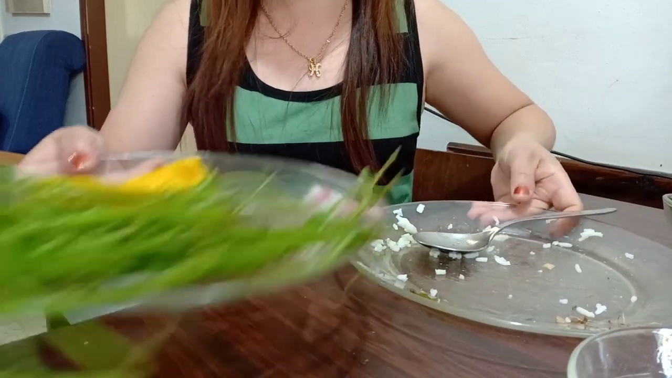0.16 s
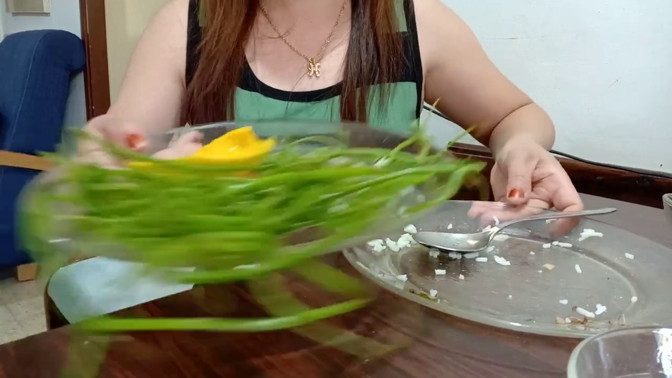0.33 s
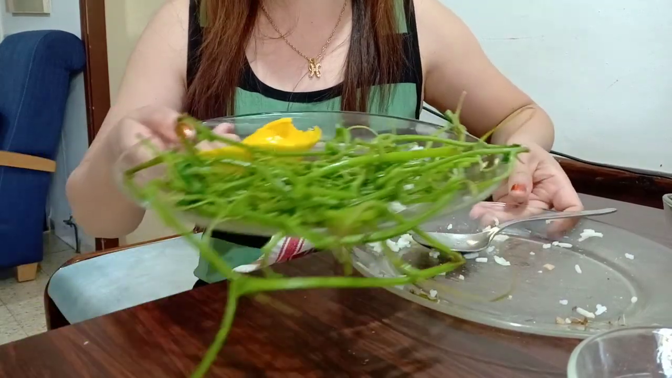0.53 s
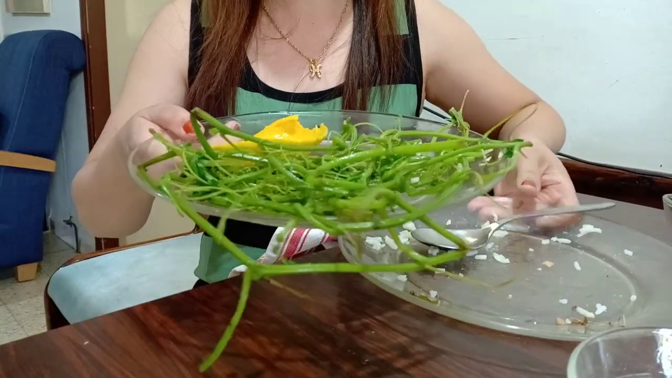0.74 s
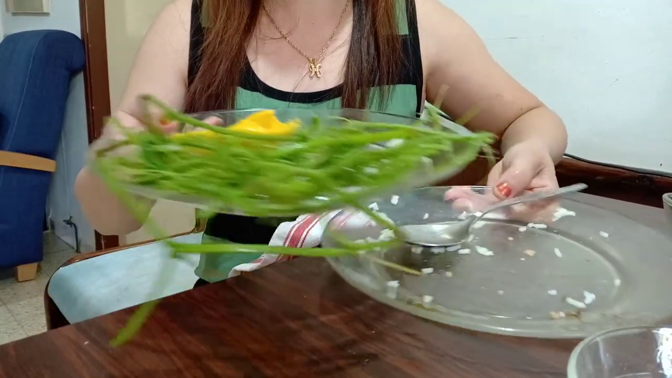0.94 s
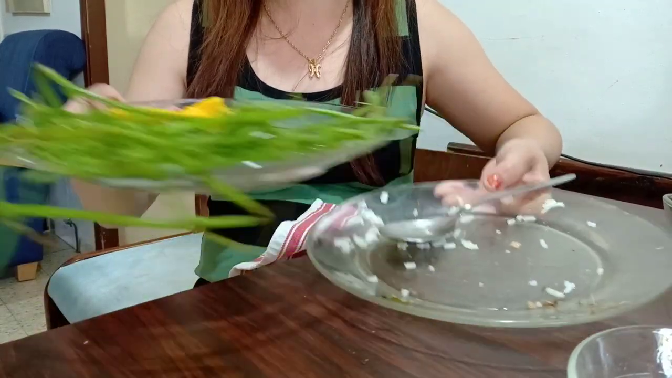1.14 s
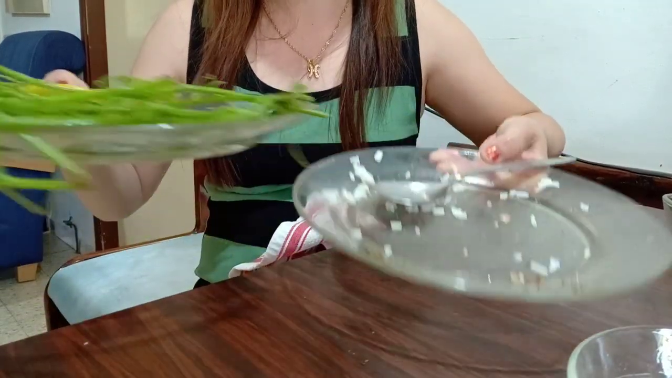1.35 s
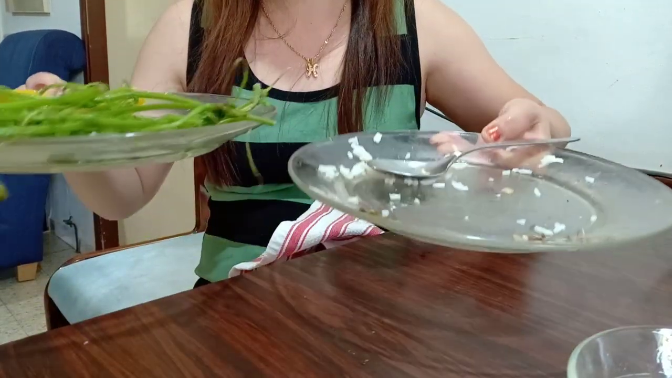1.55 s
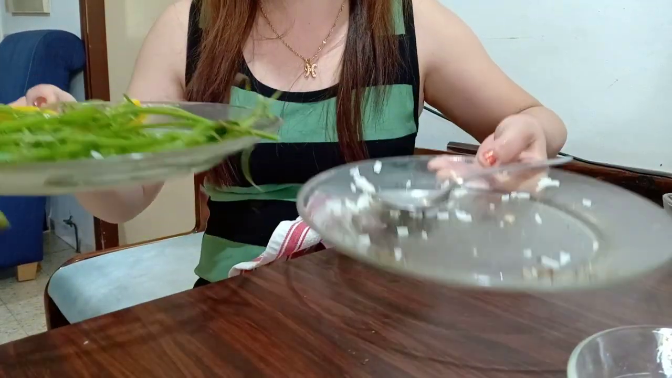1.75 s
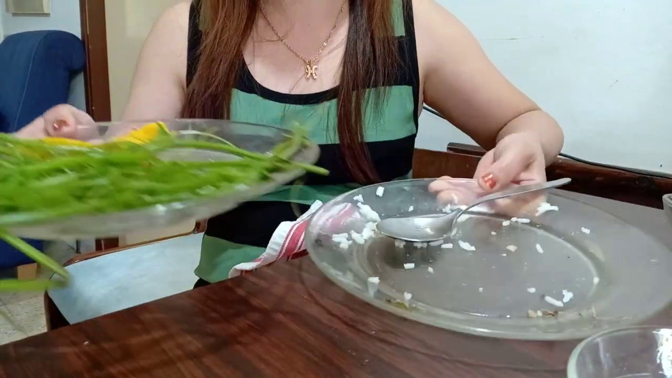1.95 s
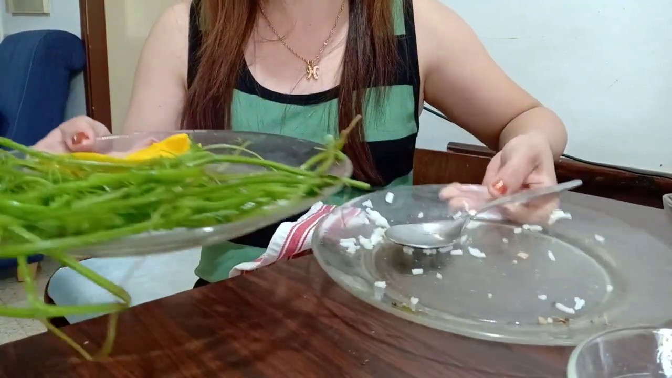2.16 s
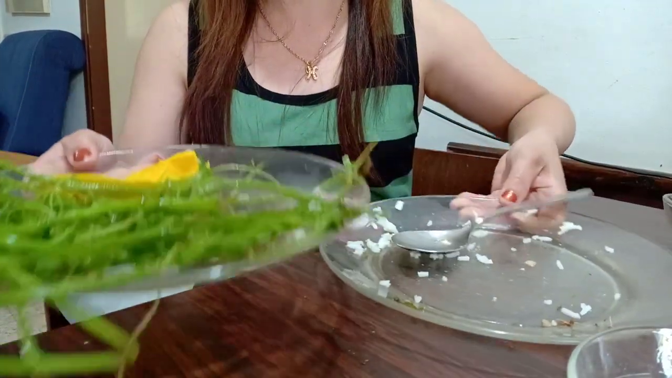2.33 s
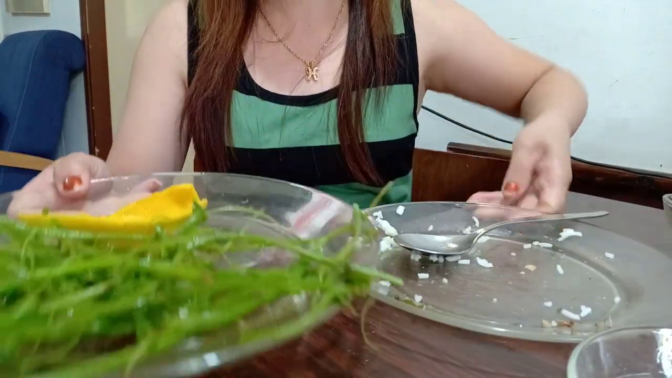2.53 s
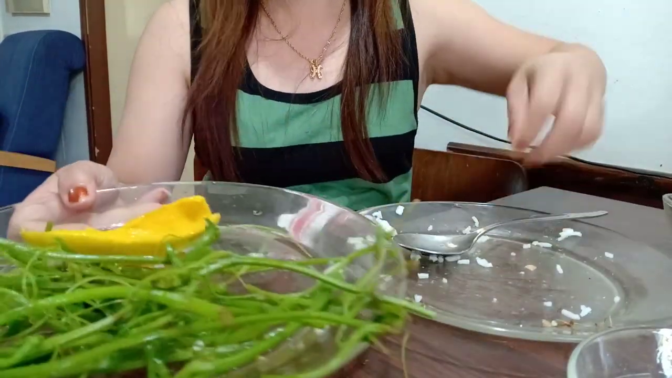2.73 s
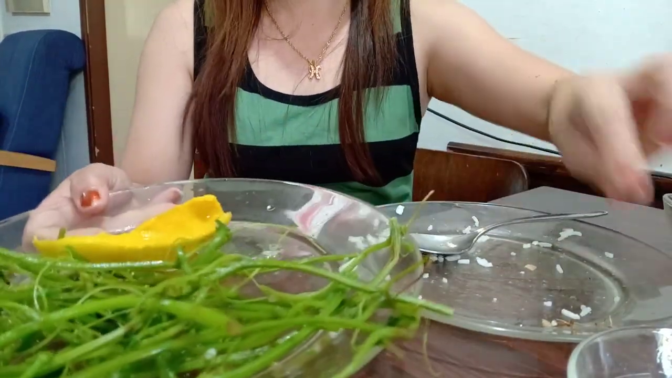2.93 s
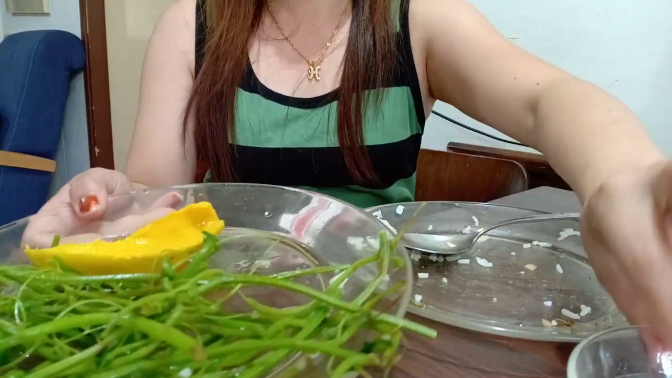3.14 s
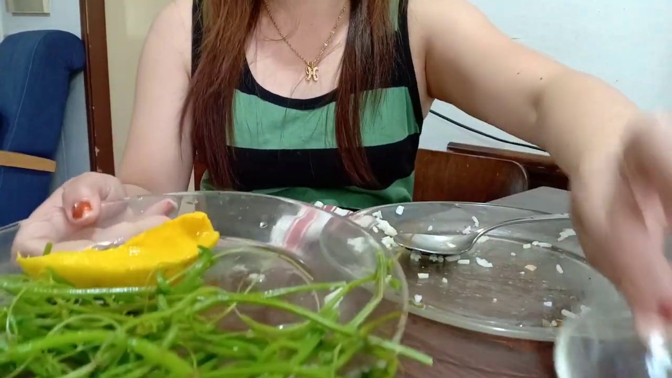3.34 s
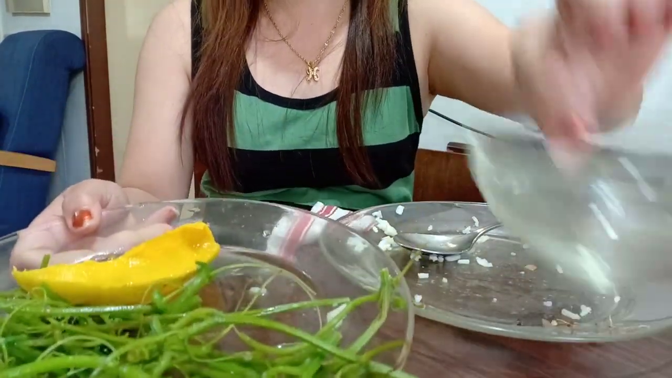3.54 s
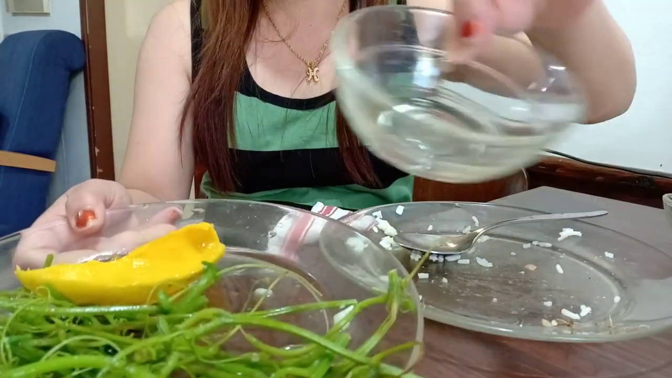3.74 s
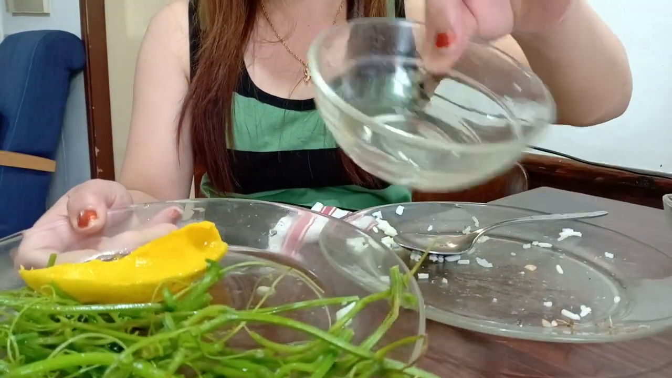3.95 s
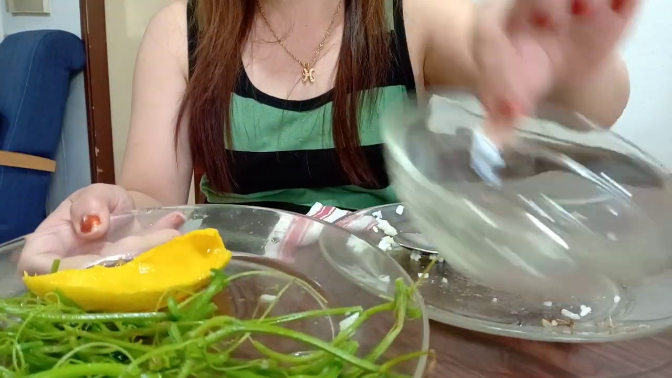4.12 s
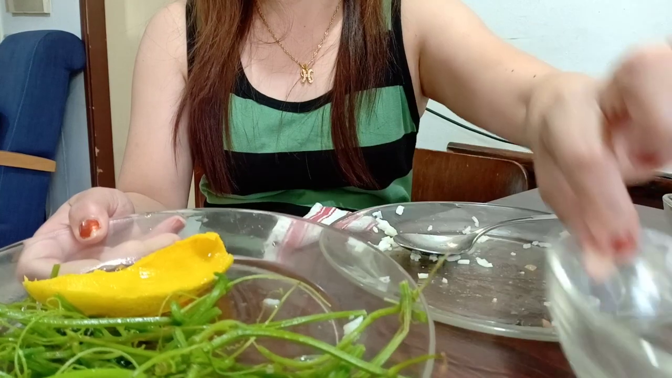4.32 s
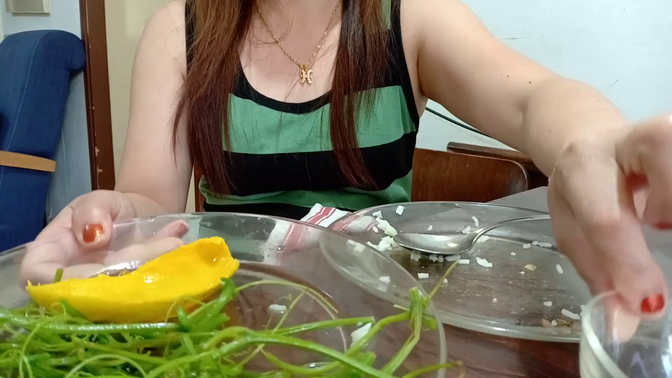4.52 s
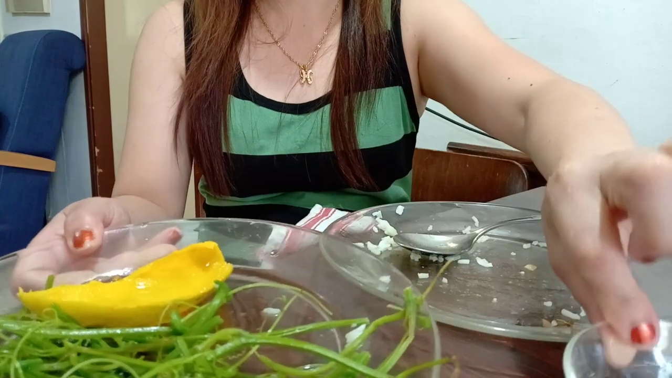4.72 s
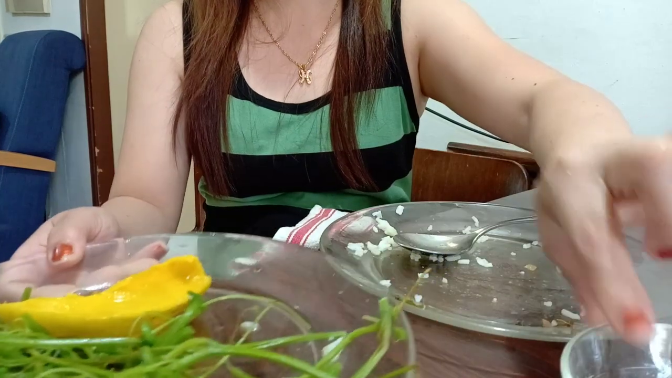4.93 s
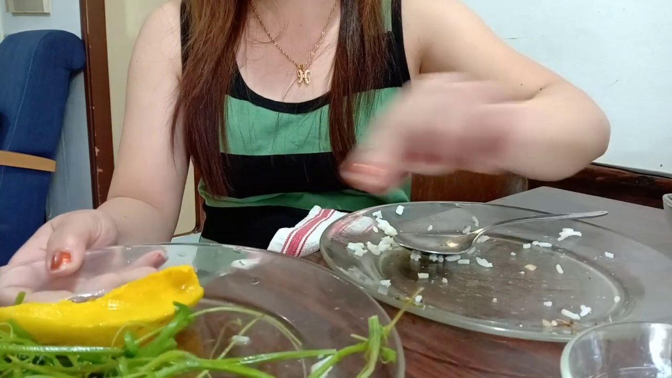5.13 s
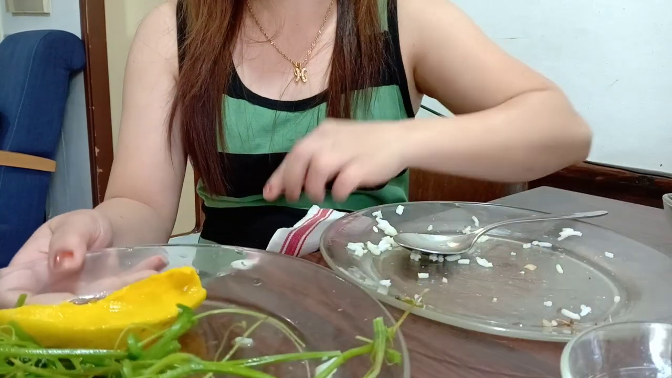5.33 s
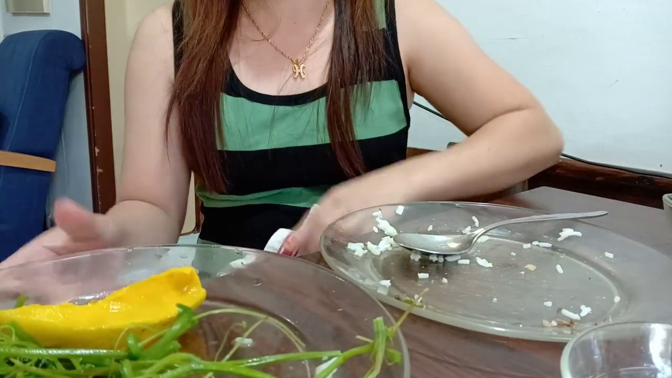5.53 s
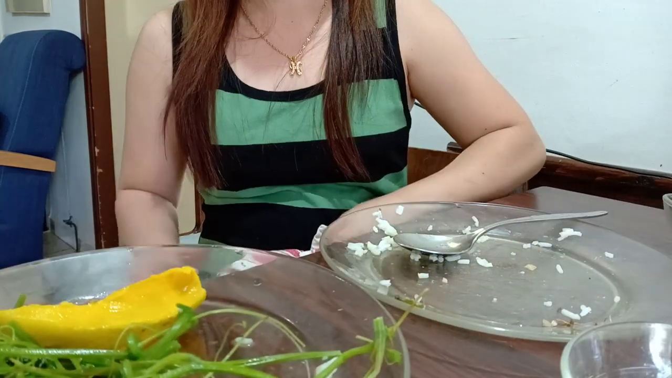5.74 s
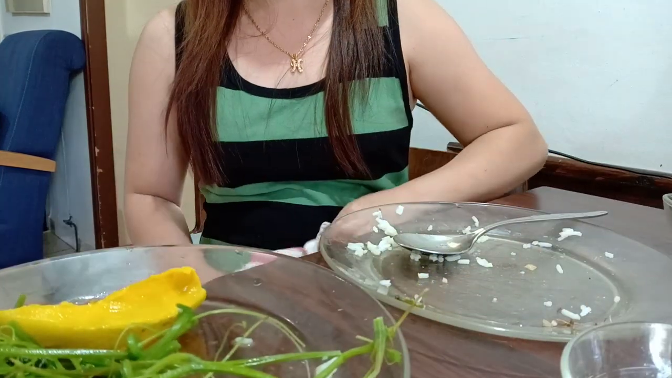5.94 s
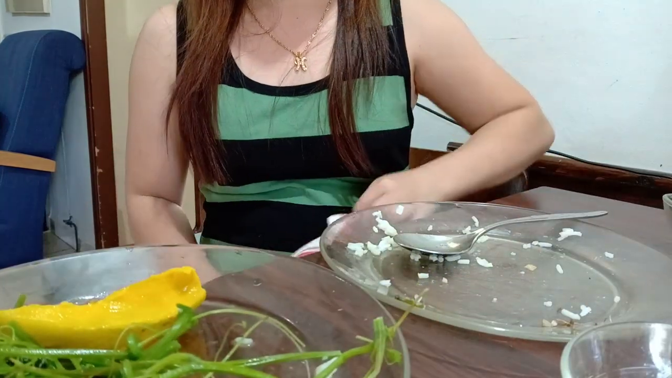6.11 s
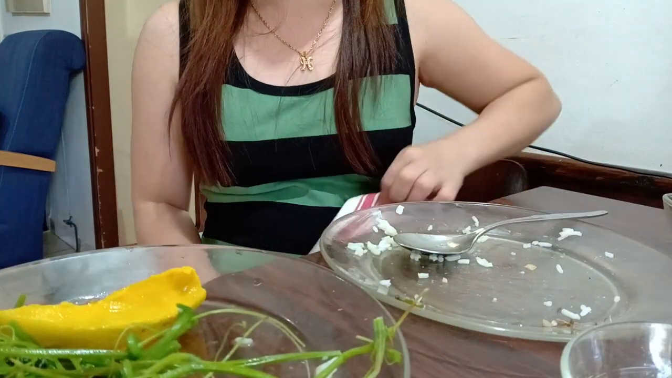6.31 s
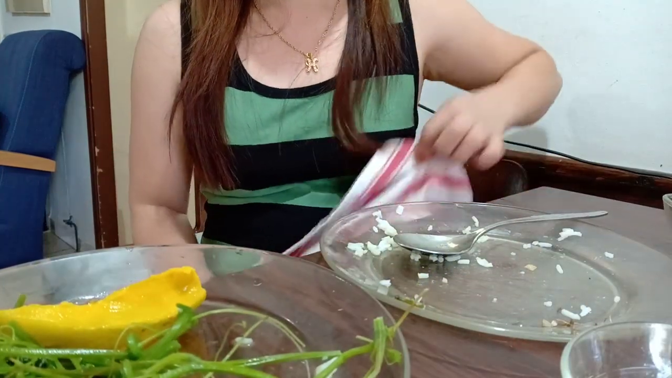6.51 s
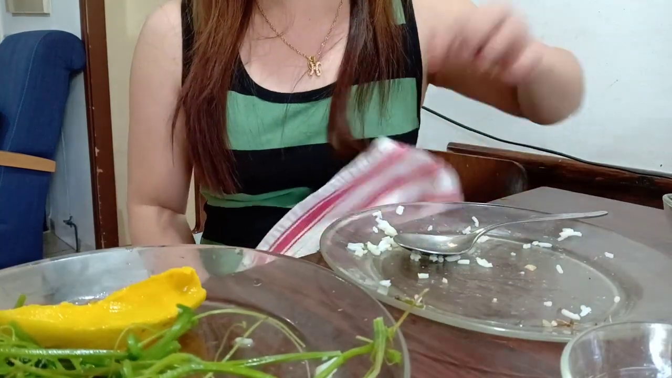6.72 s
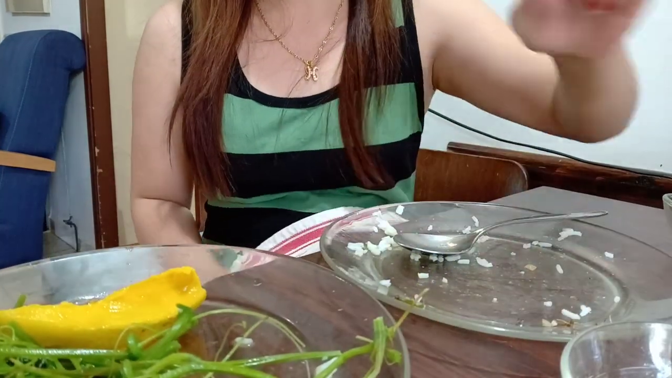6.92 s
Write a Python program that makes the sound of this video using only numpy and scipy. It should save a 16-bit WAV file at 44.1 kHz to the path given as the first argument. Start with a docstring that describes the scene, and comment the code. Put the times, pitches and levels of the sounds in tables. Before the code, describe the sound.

A glass dish rubs briefly across a wooden table, with a stronger scrape near one second. A plate lands with a hard, loud knock and short rattle, then a bright spoon clink. After a quiet pause, a small glass bowl is lifted and set down in lighter clunks, ending with another sharp knock. Faint fridge hum, soft room air, close stereo microphones in a small hard room.

```python
"""Glassware on a wooden table

Glass plates with a spoon and a small glass bowl are slid and set down in a small hard room. Blows drive
modal resonators of table and glass, with rebounds as chatter; slides drive them with random slips.
Filtered noise gives the room air, wavering sines a fridge motor, falling tones a bird far outside.
Two microphones a hand apart hear phases alike in the bass and unlike in the treble."""
import sys
import numpy as np
from scipy import signal
from scipy.fft import rfft, irfft
from scipy.io import wavfile
from scipy.ndimage import uniform_filter1d

SR = 44100
rng = np.random.default_rng(int(sys.argv[2]) if len(sys.argv) > 2 else 0)


def file_out(sig):
    """Save sig as 16-bit WAV at sys.argv[1]."""
    # one column per channel
    cols = np.atleast_2d(sig).T
    # limit, then scale
    lim = np.clip(cols, -1, 1)
    pcm = np.round(lim * 32767).astype(np.int16)
    wavfile.write(sys.argv[1], SR, pcm)


N = 307363

# Spectrum of the room air before overall scaling: frequency_hz, level_db
AIR_SPECTRUM = [(18, -39), (30, -28), (45, -14), (70, -15.5), (93, -7), (145, -10.5), (210, 0), (355, -10),
                (384, -6), (760, -17), (1810, -21), (1960, -14.5), (5310, -33.5), (6050, -30),
                (13700, -43.5), (16000, -46.5)]
AIR_DB = -54.5  # rms of the air before the background drift
# Likeness of left and right: frequency_hz, correlation
LIKENESS = [(60, 0.97), (180, 0.85), (550, 0.34), (1650, -0.07), (4970, 0.01), (15000, 0.01)]
# Steady tones of the fridge motor, before a common gain: frequency_hz, level_db
MOTOR_TONES = [(204.6, -61.5), (247.6, -64.5), (328.4, -67.5), (393.0, -71), (452.2, -71.5), (538.3, -78),
               (979.8, -71), (1028, -76.5), (1077, -78), (1529, -82), (1911, -69.5), (2202, -77),
               (2885, -77), (5970, -83.5), (6164, -84), (6950, -84)]
# Second shaft order and mains hum, beating twice a second, before the same gain: frequency_hz, level_db
LOW_HUM = [(98, -65), (100, -73)]
MOTOR_GAIN_DB, MOTOR_WAVER_DB = 2.5, 0.92
# Slow drift of air and motor: time_s, gain_db
BACKGROUND_DRIFT = [(0, 2), (1.2, 0.5), (1.8, 1.5), (2.801, -2.5), (3.9, -2.5), (5.6, 0.5), (6.97, -0.5)]

# Whistles of the far bird: start_s, length_s, first_hz, last_hz, level_db
BIRD_WHISTLES = [(1.14, .07, 3960, 3850, -61.5), (3.69, 0.11, 4060, 3900, -62.5),
                 (6.518, 0.048, 4400, 3860, -62), (6.605, .04, 4400, 4230, -67)]
# Ticks of grit and fingernails: start_s, level_db, centre_hz
GRIT_TICKS = [(0.7826, -44.5, 7300), (0.818, -44, 11400), (0.826, -48, 11300), (0.8476, -47, 7270),
              (1.196, -48.5, 7120), (1.505, -54, 8340), (1.762, -48, 8400), (1.841, -48, 7100),
              (3.1006, -50, 8990), (3.105, -46, 8060), (3.1228, -47, 6760), (3.1307, -52, 6900),
              (3.2962, -43, 7000), (3.338, -47, 7060), (3.6252, -50.5, 6950), (4.2114, -50, 8400),
              (5.238, -42, 7460), (5.4188, -46, 7240), (5.5216, -38, 7340), (6.6402, -48, 7100)]
TICK_SPREAD_DB = 5  # standard deviation of the random left-right difference

# Modes of the table top: frequency_hz, width_hz, level_db
TABLE_MODES = [(120.6, 21, -11.5), (192, 40, -12.5), (237.1, 32.3, 3.5), (313.7, 55, 8), (388.2, 77, 7),
               (461, 145, 4), (527, 160, 1), (668, 55, -14)]
TABLE_WIDTH = 0.3  # share of the left-right difference kept: the table sounds nearly alike at both
# Modes of the knock at the foot ring: frequency_hz, width_hz, level_db
KNOCK_MODES = [(791, 320, 6), (1065, 68, 3.5), (1298, 370, 4.5), (1776, 390, 6), (2070, 430, 6.5),
               (2310, 62, 2), (2376, 150, 0), (2470, 41, -7), (3260, 750, -30)]
# Modes of the struck plate: frequency_hz, width_hz, level_db
PLATE_MODES = [(1610, 34, -6), (2010, 74, -12), (2240, 16, -15), (2760, 45, 0), (3700, 38, -14),
               (4230, 57, -15), (4750, 30, -9), (5310, 26, -18), (5920, 35, -10), (6510, 15, -26),
               (6820, 21, -16), (7180, 63, -9), (7730, 15, -27), (7960, 51, -20), (8290, 18, -26),
               (8540, 130, -18), (9020, 32, -20), (9550, 32, -36), (10000, 79, -31), (10500, 60, -33),
               (11100, 65, -30), (11300, 15, -41), (11600, 41, -22), (12800, 24, -46), (13300, 110, -29),
               (13700, 25, -43), (13900, 32, -33), (14300, 23, -37), (14600, 66, -33), (15100, 100, -34)]
# Modes of the dish that slides: frequency_hz, width_hz, level_db
DISH_MODES = [(517, 80, -10), (942, 61, -11), (1500, 32, -13), (1640, 34, -7), (1850, 37, -8),
              (2120, 30, -9), (2270, 36, -13), (2530, 47, 0), (2930, 41, -12), (3270, 48, -24),
              (3780, 47, -16), (4260, 41, -23), (4790, 88, -16), (5450, 30, -28), (5920, 43, -19),
              (6790, 44, -25), (7320, 99, -28), (8550, 38, -20), (10100, 48, -37), (10500, 110, -37),
              (11100, 100, -40), (11700, 40, -35)]
# Modes of the small bowl: frequency_hz, width_hz, level_db
BOWL_MODES = [(2060, 26, 0), (2610, 52, -3), (2870, 29, -4), (3770, 34, -13), (4180, 45, -16),
              (4760, 130, -14), (5310, 97, -16), (5940, 53, -13), (7200, 79, -11), (8050, 200, -24),
              (8570, 42, -16), (9050, 34, -28), (10100, 50, -31), (10600, 27, -30), (11700, 34, -29),
              (13400, 30, -32)]
# Spectrum of the crowded small modes of glass: frequency_hz, level_db
DENSE_MODES = [(800, -42), (1500, -4), (2800, 1.5), (3400, -15), (5000, -12), (7500, -14.5), (9200, -23),
               (12000, -38), (16000, -45.5)]

# Slides that swell and die away: height_s, swell_s, fade_s, glass (name),
# table_rub_db, foot_ring_rub_db, glass_rub_db
GLASS_SLIDES = [(0.036, 0.0029, 0.047, "dish", -61, -50.5, -33),
                (0.072, .025, 0.02, "dish", -69, -49, -32.5),
                (0.105, 0.033, 0.054, "dish", -55, -52, -42.5),
                (0.893, 0.064, 0.029, "dish", -75, -65, -40.5),
                (0.979, 0.045, 0.063, "dish", -46, -37.5, -39),
                (3.297, 0.0043, 0.029, "bowl", -43, -42, -50.5),
                (3.325, .03, 0.017, "bowl", -42.5, -43.5, -54),
                (4.35, 0.058, 0.047, "bowl", -59, -54.5, -64), (4.8, .1, 0.12, "bowl", -71, -54, -54),
                (4.925, 0.086, 0.17, "bowl", -54.5, -50.5, -51),
                (5.05, 0.065, 0.08, "bowl", -48.5, -54, -47)]
EDGE_DB = -15.5  # stroke level one swell before and one fade after its height
SLIPS_PER_S, UNEVEN_DB = 1200, 2.5  # a few slips are much stronger

# Blows of glass on wood and of a spoon on the plate: start_s, knock_db, table_thud_db,
# lowest_thud_hz, glass (name), ring_db, chatter_s
GLASS_BLOWS = [(1.9228, -1, -2, 90, "plate", -23, 0.0048), (1.9342, -16, -8, 90, "plate", -19.5, 0.041),
               (1.995, -12.5, -16, 90, "plate", -31, .015),
               (2.0028, -20.5, -13.5, 90, "plate", -26.5, 0.0096),
               (2.393, -12, -20.5, 90, "plate", -4, 0.034), (2.4138, -17, -16, 89.5, "plate", -22, 0.052),
               (2.7592, -50, -56, 197, "plate", -68, .006), (3.1045, -47, -58, 200, "plate", -50.5, .006),
               (3.3358, -41, -35.5, 202, "bowl", -62, .005), (4.094, -18, -15, 129, "bowl", -30.5, 0.0078),
               (4.1053, -21, -20.5, 130, "bowl", -52, 0.0074), (4.134, -30, -23.5, 130, "bowl", -57, 0.022),
               (4.1607, -45, -37, 130, "bowl", -54, 0.016),
               (4.5087, -22.5, -26, 198, "bowl", -26.5, 0.0063), (4.5476, -8, -1, 250, "bowl", -26.5, 0.01),
               (4.58, -33, -15.5, 239, "bowl", -37, 0.0068),
               (4.7508, -33.5, -10.5, 222, "bowl", -54, 0.012), (4.9165, -39, -52, 200, "bowl", -64, .005),
               (5.0805, -6.5, -7.5, 127, "plate", -21, .006),
               (5.089, -17.5, -13, 130, "bowl", -19.5, 0.014),
               (5.2422, -29.5, -27, 200, "bowl", -35.5, 0.0041),
               (5.4201, -49, -31.5, 150, "bowl", -52, .009),
               (5.5193, -45.5, -44, 205, "plate", -46.5, 0.0048)]
# Decay time until table or fingers damp the struck glass: glass (name), time_s
FREE_RING_S = {"plate": 0.02, "bowl": 0.032}
# Placement, left minus right: glass (name), difference_db
PLACE_DB = {"plate": 2.5, "bowl": -0.5}
REBOUNDS_PER_S, CHATTER_DB = 1500, 5  # chatter against the first contact
CRACK_DB = -1  # crack against the knock
# Spectrum of the crack at the edge of a blow: frequency_hz, level_db
CRACK_SPECTRUM = [(410, -36.5), (700, 5), (1400, 7.5), (2460, 8), (4920, -12.5), (6950, -23), (7510, -27),
                  (11500, -58), (15000, -70)]
# Soft bumps of a wrist or a rim on the table: start_s, peak_db
SOFT_BUMPS = [(0.658, -35), (0.846, -44), (0.942, -34), (0.974, -38), (1.055, -36), (4.318, -36),
              (4.955, -37), (5.01, -40.5), (5.042, -40), (5.368, -32), (5.43, -34)]
SOFT_CONTACT_S = 0.0034

# Reverberation time: frequency_hz, t60_s
ROOM_DECAY = [(100, 0.25), (400, 0.48), (1500, 0.42), (4000, 0.44), (12000, 0.48)]
ROOM_DB = -10  # room sound against the near sound
EDGE_HZ = 16100  # upper band limit


def amp(db):
    """Decibel law: a level becomes an amplitude ratio."""
    return 10 ** (np.asarray(db) / 20)


def evened(x):
    """Normalization to unit root-mean-square."""
    return x / np.sqrt(np.mean(x ** 2) + 1e-20)


def read(points, hz):
    """Interpolation of a spectrum along logarithmic frequency."""
    f, value = np.transpose(points)
    return np.interp(np.log(hz + 1), np.log(f + 1), value)


def add(mix, s, sound):
    """Superposition: a sound joins the mix from time s."""
    part = mix[:, round(s * SR):][:, :sound.shape[1]]
    part += sound[:, :part.shape[1]]


def sides(pan_db):
    """Level difference between the two microphones: half to each side."""
    return amp(np.array([[.5], [-.5]]) * pan_db)


def highpass(order, hz, x):
    """Attenuation of the bass by a Butterworth filter."""
    return signal.sosfilt(signal.butter(order, hz, "high", fs=SR, output="sos"), x)


def apart(hz):
    """Phase difference between microphones: small in the bass, about a quarter turn in the treble."""
    half = np.arccos(np.clip(read(LIKENESS, hz), 0, 1)) / 2
    return np.array([half, -half]) * rng.choice([-1, 1], np.shape(hz))


def correlated(first, second, hz):
    """Partial coherence: two independent spectra become a left-right pair of set likeness."""
    same = np.clip(read(LIKENESS, hz), -1, 1)
    same = same.reshape((-1,) + (1,) * (first.ndim - 1))
    return np.array([first, same * first + np.sqrt(1 - same ** 2) * second])


def air():
    """Broadband noise: random short-time spectra with drifting patches give the room air."""
    frames, hz = N // 256 + 5, np.fft.rfftfreq(1024, 1 / SR)
    a, b, c, d, patches = rng.standard_normal((frames, 513, 5)).T
    patches = uniform_filter1d(patches, 10, 0)  # along frequency
    patches = evened(uniform_filter1d(patches, 14, 1))  # along time
    spectra = correlated(a + 1j * b, c + 1j * d, hz)
    spectra *= amp(read(AIR_SPECTRUM, hz)[:, None] + 1.1 * patches)
    noise = signal.istft(spectra, nperseg=1024, noverlap=768)[1][:, :N]
    return amp(AIR_DB) * evened(noise)


def fridge():
    """Line spectrum: steady tones of the motor and mains hum, each wavering a little in level."""
    hz, db = np.transpose(MOTOR_TONES + LOW_HUM)[:, :, None]
    t = np.arange(N) / SR
    waver = evened(uniform_filter1d(rng.standard_normal((N // 512 + 1, len(hz))), 8, 0)).T
    waver_s = np.arange(waver.shape[1]) * 512 / SR
    waver = np.array([np.interp(t, waver_s, line) for line in waver])
    level = amp(db + MOTOR_GAIN_DB + MOTOR_WAVER_DB * waver)
    start = 2 * np.pi * rng.random(hz.shape)
    return np.array([(level * np.sin(2 * np.pi * hz * t + start + lead)).sum(0) for lead in apart(hz)])


def bird():
    """Frequency glide: faint falling whistles, broken by random amplitude."""
    out = np.zeros((2, N))
    for s, length_s, first_hz, last_hz, db in BIRD_WHISTLES:
        hz = np.linspace(first_hz, last_hz, round(length_s * SR))
        broken = np.clip(evened(uniform_filter1d(rng.standard_normal(len(hz)), 500)), 0, 2)
        tone = np.sin(2 * np.pi * np.cumsum(hz) / SR + apart(hz[:1]))
        add(out, s, tone * broken * amp(db) * np.hanning(len(hz)))
    return out


def ticks():
    """Impulsive radiation: tiny bright snaps of a few cycles with some noise."""
    out, t = np.zeros((2, N)), np.arange(256) / SR
    envelope = np.exp(-t / 0.00038) * np.minimum(t / 0.00008, 1)
    for s, db, hz in GRIT_TICKS:
        snap = np.sin(2 * np.pi * hz * t) + .5 * np.diff(rng.standard_normal((2, 257)))
        place = sides(TICK_SPREAD_DB * rng.standard_normal())
        add(out, s, amp(db) * snap * envelope * place)
    return out


def body(modes, narrowest, widest, rise_s, dense_db=-99, dense_s=.01):
    """Modal superposition: one tap rings damped modes over a dying haze of small ones, peak 1."""
    hz, width, db = np.transpose(modes)[:, :, None]
    t, width = np.arange(SR // 4) / SR, np.clip(width, narrowest, widest)
    fade = amp(db) * width * np.exp(-np.pi * width * t)  # a wide mode dies fast
    ring = np.array([(fade * np.sin(2 * np.pi * hz * t + lead)).sum(0) for lead in apart(hz)])
    haze_spectrum = amp(read(DENSE_MODES, np.fft.rfftfreq(len(t), 1 / SR)))
    haze = irfft(rfft(rng.standard_normal(ring.shape)) * haze_spectrum, len(t))
    ring = ring / abs(ring).max() + amp(dense_db) * evened(haze) * np.exp(-t / dense_s)
    ring *= 1 - np.exp(-(t / rise_s) ** 2)
    return ring / abs(ring).max()


def slides(table, knock, glasses):
    """Stick-slip friction: uneven random slips of the foot ring shake table and glass."""
    out = np.zeros((2, N))
    for s, swell_s, fade_s, name, *rub_db in GLASS_SLIDES:
        t = np.arange(-swell_s, 2 * fade_s, 1 / SR)
        stroke = amp(EDGE_DB * np.maximum(-t / swell_s, t / fade_s))
        for db, thing in zip(rub_db, (table, knock, glasses[name])):
            slips = rng.standard_normal(len(t)) * (rng.random(len(t)) < SLIPS_PER_S / SR)
            strength = amp(UNEVEN_DB * rng.exponential(1, len(t)).clip(0, 4))
            drive = (stroke * evened(slips * strength))[None]
            rub = signal.fftconvolve(drive, thing / np.linalg.norm(thing[0]), axes=1)
            add(out, s - swell_s, amp(db) * rub)
    return out


def crack(rise_s, fade_s):
    """Transient excitation: a short burst of splintered noise."""
    t, hz = np.arange(2048) / SR, np.fft.rfftfreq(2048, 1 / SR)
    noise = irfft(rfft(rng.standard_normal((2, 2048))) * amp(read(CRACK_SPECTRUM, hz)))
    burst = evened(noise) * np.exp(-t / fade_s) * (1 - np.exp(-(t / rise_s) ** 2)) / 2
    return highpass(3, 500, burst)


def chatter(chatter_s):
    """Repeated impact: the first contact, then random rebounds that die away."""
    t = np.arange(SR // 4) / SR
    rebounds = rng.choice([-1., 1.], len(t)) * (rng.random(len(t)) < REBOUNDS_PER_S / SR)
    rebounds *= np.exp(-t / max(chatter_s, .001))
    return amp(CHATTER_DB) * rebounds / (np.linalg.norm(rebounds) + 1e-9) + (t == 0)


def bumps(table):
    """Contact duration: a long soft contact smooths the response of the table."""
    out = np.zeros((2, N))
    soft = signal.fftconvolve(table, np.hanning(round(SOFT_CONTACT_S * SR))[None], axes=1)
    for s, db in SOFT_BUMPS:
        add(out, s, amp(db) * soft / abs(soft).max())
    return out


def blows(table, knock, glasses):
    """Impact excitation: each blow drives table and glass, and the glass chatters on."""
    out, t = np.zeros((2, N)), np.arange(SR // 4) / SR
    for s, knock_db, table_db, low_hz, name, ring_db, chatter_s in GLASS_BLOWS:
        glass = amp(ring_db) * glasses[name] * np.exp(-t / FREE_RING_S[name])
        struck = glass + amp(knock_db) * knock
        clatter = signal.fftconvolve(struck, chatter(chatter_s)[None], axes=1)
        add(out, s, clatter * sides(PLACE_DB[name]))
        add(out, s, amp(table_db) * highpass(2, low_hz, table))
        add(out, s, amp(knock_db + CRACK_DB) * crack(0.00033, 0.0061))
    return out


def room(x):
    """Reverberation: dense echoes, alike at both sides in the bass, each band with its own decay."""
    size = SR * 2 // 3
    a, b = rfft(rng.standard_normal((2, size)))
    echoes = irfft(correlated(a, b, np.fft.rfftfreq(size, 1 / SR)), size)
    hz, t, spectra = signal.stft(echoes, SR, nperseg=256)
    decay = amp(-60 * t / read(ROOM_DECAY, hz)[:, None])
    tail = signal.istft(spectra * decay, SR, nperseg=256)[1]
    # walls are a few metres away: echoes grow in from 8 to 24 ms
    tail *= np.clip(np.arange(tail.shape[1]) / SR / 0.016 - .5, 0, 1)
    source = x.mean(0)[None] * np.sqrt(2)
    return signal.fftconvolve(source, tail / np.linalg.norm(tail[0]), axes=1)[:, :N]


def scene():
    """Superposition of background, near sound and its reverberation."""
    table, knock = body(TABLE_MODES, 15, 200, 0.0018), body(KNOCK_MODES, 27, 600, 0.00066)
    table = table.mean(0) + TABLE_WIDTH * (table - table.mean(0))
    knock = highpass(2, 600, knock)  # the knock keeps no bass below 600 Hz
    glasses = {
        "plate": body(PLATE_MODES, 23, 90, 0.0012, dense_db=-15.5, dense_s=0.014),
        "dish": body(DISH_MODES, 25, 150, 0.00024, dense_db=-16.0, dense_s=0.006),
        "bowl": body(BOWL_MODES, 50, 200, .0003, dense_db=-5, dense_s=.01)}
    drift = amp(np.interp(np.arange(N) / SR, *np.transpose(BACKGROUND_DRIFT)))
    background = (air() + fridge()) * drift
    near = ticks() + slides(table, knock, glasses) + bumps(table) + blows(table, knock, glasses)
    near = highpass(3, 70, near)  # the near sound keeps little bass below 70 Hz
    return background + bird() + near + amp(ROOM_DB) * room(near)


def record(dry):
    """Saturation and band limiting: peaks are softly squeezed, then the highest treble is cut."""
    squeezed = .95 * np.tanh(dry / .95)
    lowpass = signal.firwin(401, EDGE_HZ, window=("kaiser", 9), fs=SR)
    return signal.oaconvolve(squeezed, lowpass[None], "same")


dry = scene()
out = record(dry)
file_out(out)
```